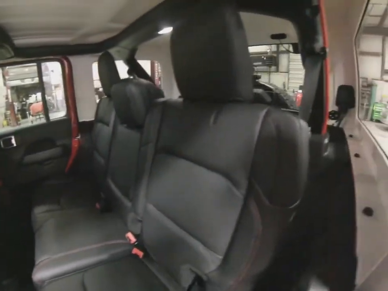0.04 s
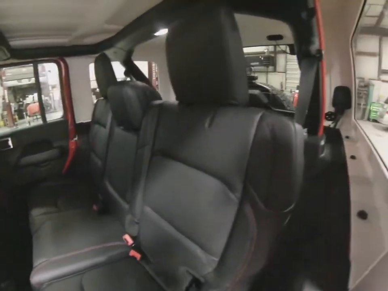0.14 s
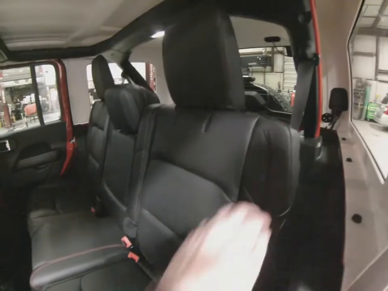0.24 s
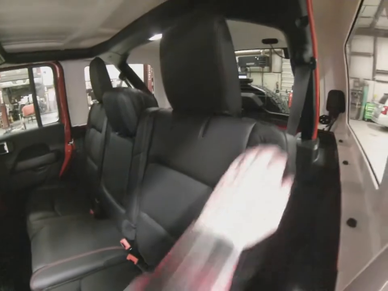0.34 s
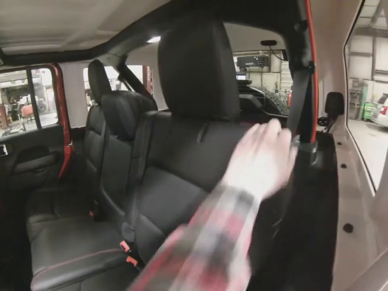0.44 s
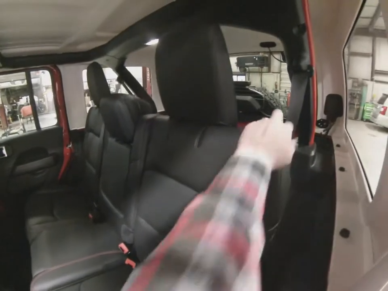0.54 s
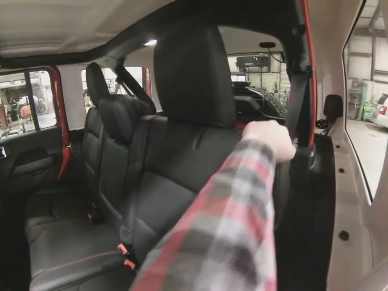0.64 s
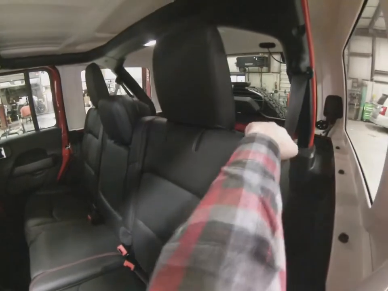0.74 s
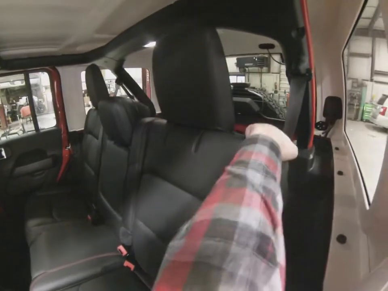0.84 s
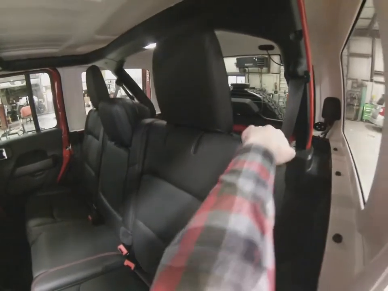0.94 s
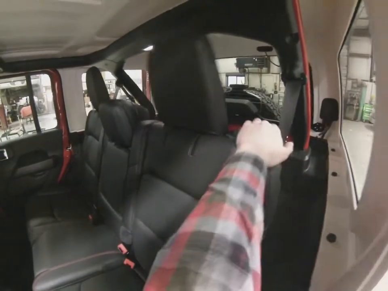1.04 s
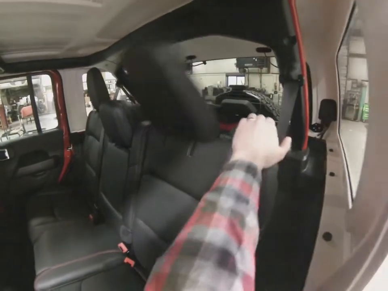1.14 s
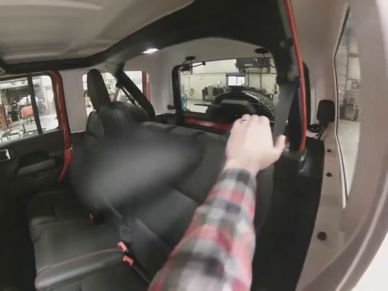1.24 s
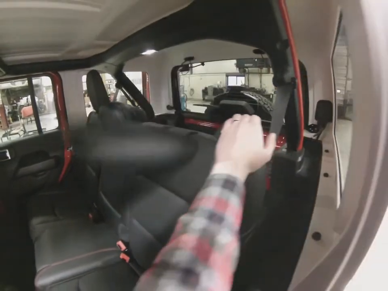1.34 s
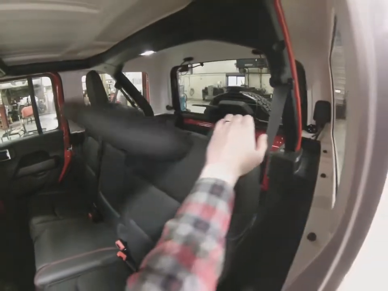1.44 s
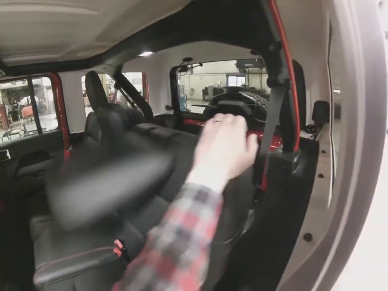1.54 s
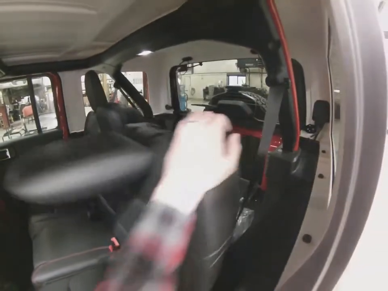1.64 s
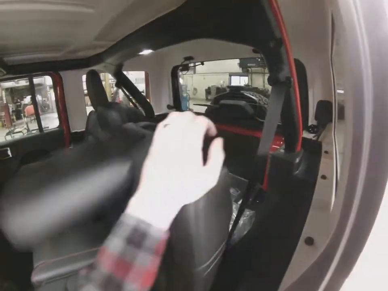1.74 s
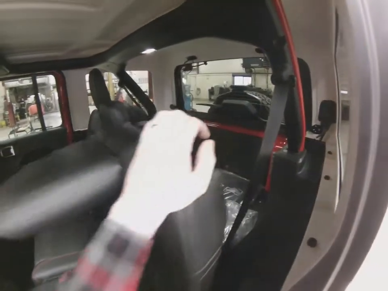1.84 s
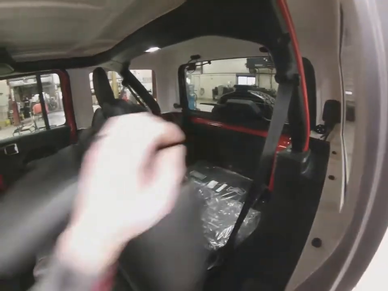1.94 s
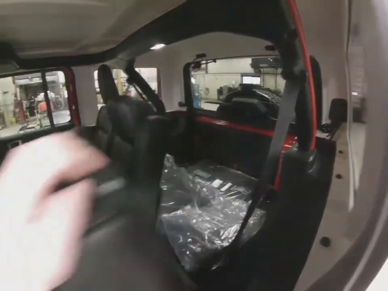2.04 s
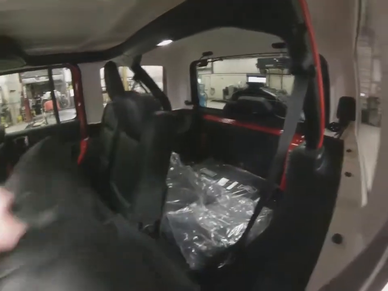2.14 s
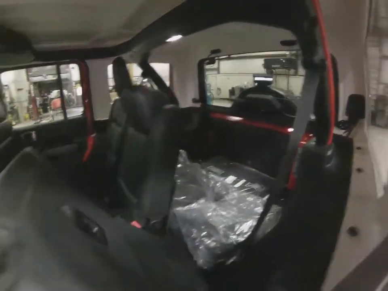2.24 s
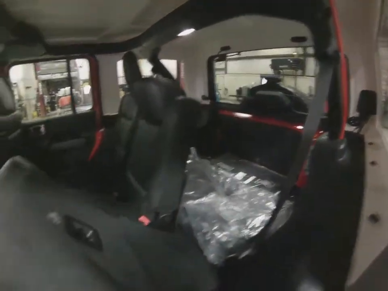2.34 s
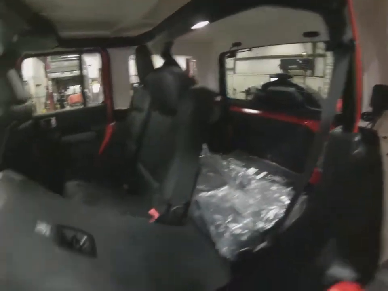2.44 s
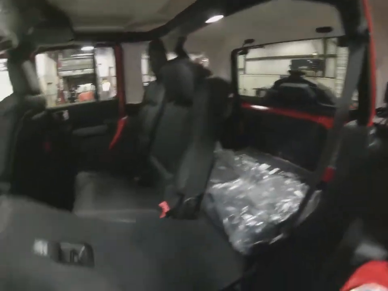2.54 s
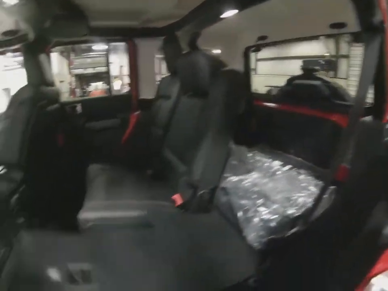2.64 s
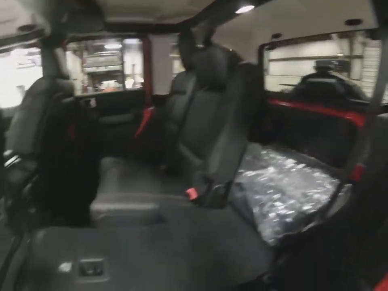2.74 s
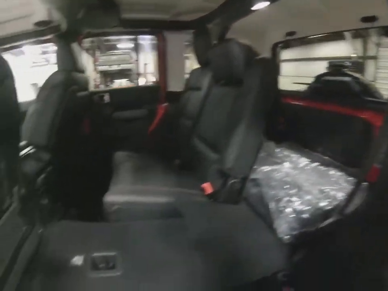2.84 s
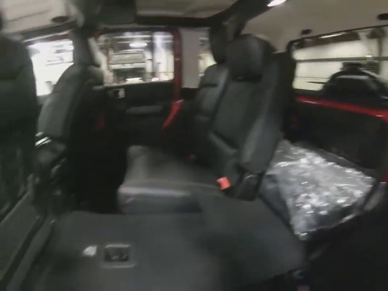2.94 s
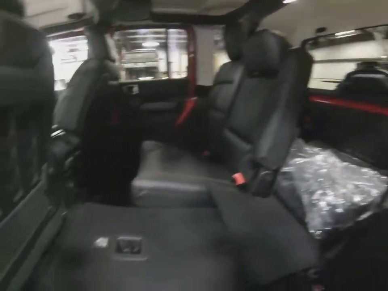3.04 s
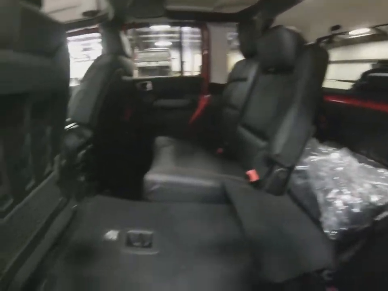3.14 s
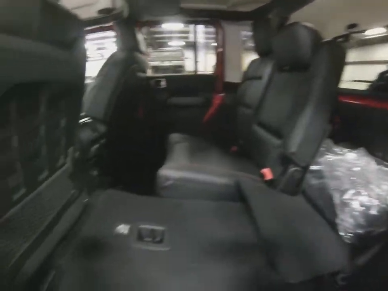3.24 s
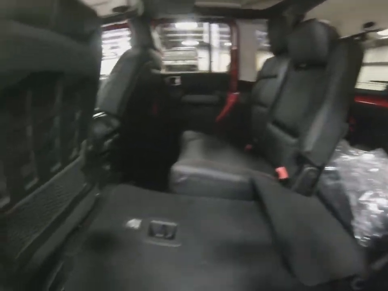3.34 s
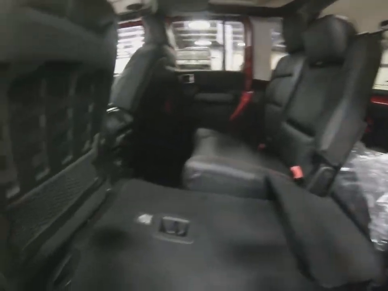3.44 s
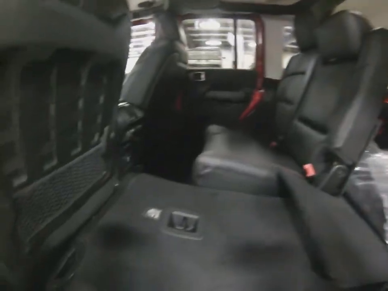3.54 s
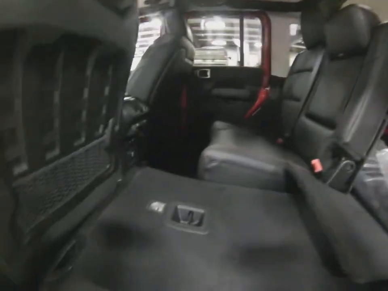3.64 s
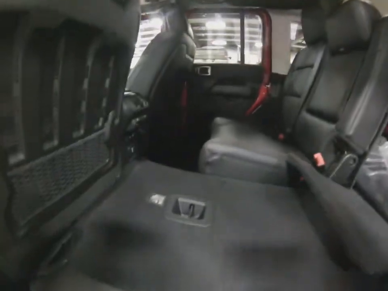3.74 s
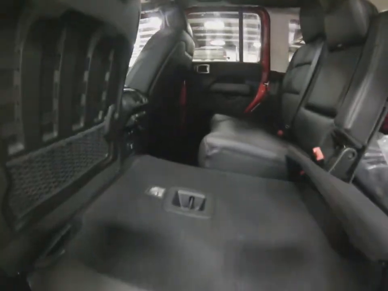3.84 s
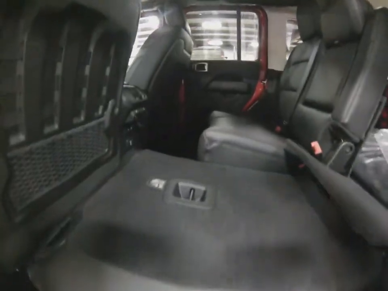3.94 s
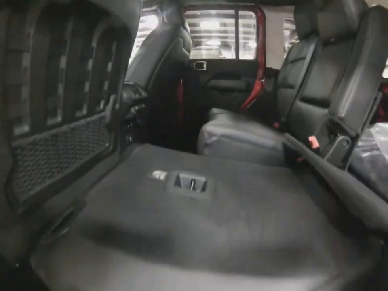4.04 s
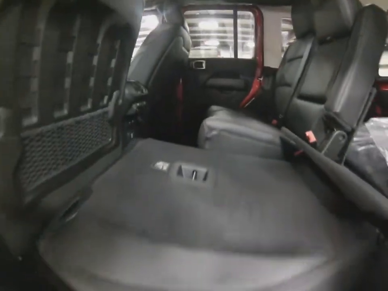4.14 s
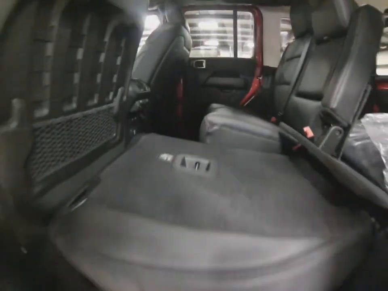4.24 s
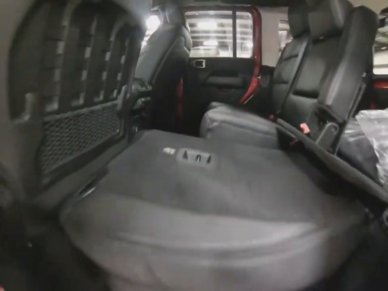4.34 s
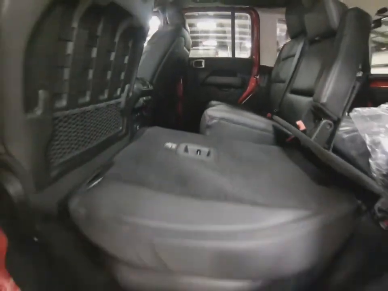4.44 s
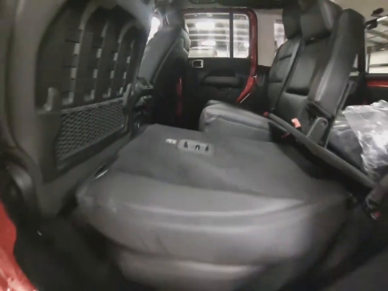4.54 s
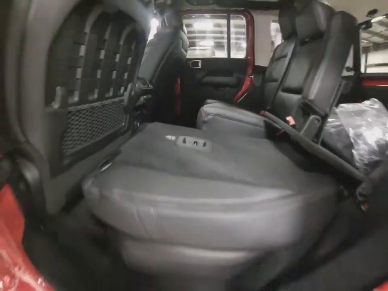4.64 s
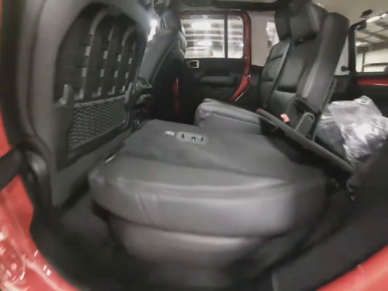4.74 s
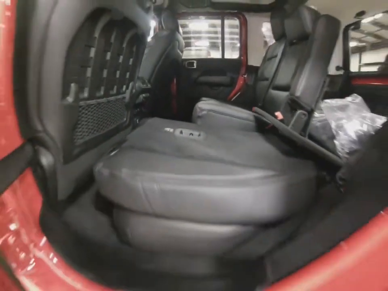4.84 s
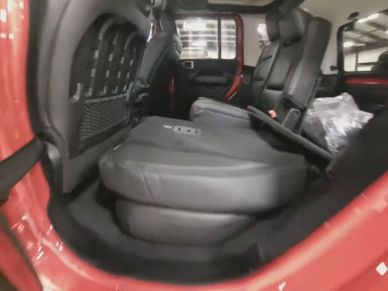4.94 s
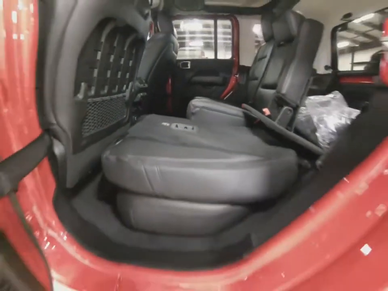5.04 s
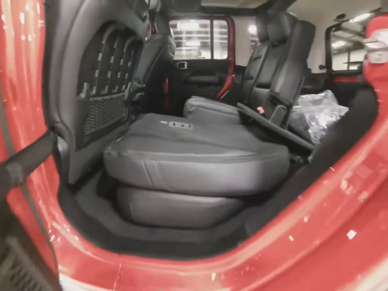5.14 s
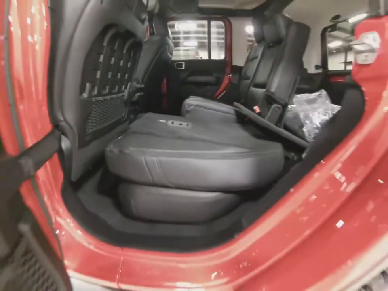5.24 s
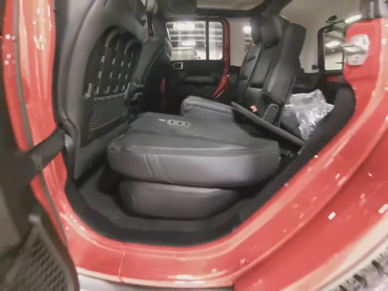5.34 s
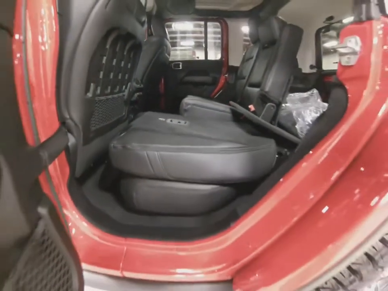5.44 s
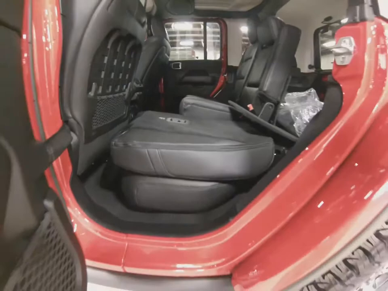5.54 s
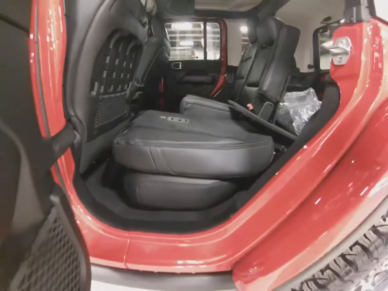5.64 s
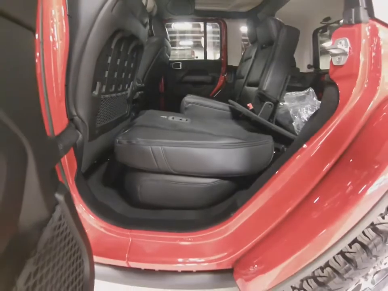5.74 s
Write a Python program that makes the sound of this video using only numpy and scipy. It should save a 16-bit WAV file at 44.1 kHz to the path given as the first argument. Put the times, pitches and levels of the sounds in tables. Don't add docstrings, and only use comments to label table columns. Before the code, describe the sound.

Inside a car parked in a large hall, a latch clicks, the headrest drops with padded knocks and shrinking bounces, leather creaks, and the seatback lands with a deep thud and metal clack. The body rocks in low rumble, then only distant hum and air noise remain, growing as the close handheld microphone backs out of the door.

```python
import sys
import numpy as np
from scipy import signal
from scipy.io import wavfile
from scipy.ndimage import uniform_filter1d

SR = 44100
rng = np.random.default_rng(int(sys.argv[2]) if len(sys.argv) > 2 else 0)


def master(y):
    cut = np.clip(np.atleast_2d(y).T, -1, 1)
    pcm = np.round(cut * 32767)
    wavfile.write(sys.argv[1], SR, pcm.astype(np.int16))


def nominal_scale(level):
    x = np.asarray(level, float) / 20
    return 10 ** x


N = 255716


def evened(x):
    return x / np.sqrt(np.mean(x ** 2) + 1e-20)


def wander(smoothing):
    return evened(uniform_filter1d(rng.standard_normal(N), smoothing))


def curve(rows):
    s, *columns = np.transpose(rows)
    return [np.interp(np.arange(N) / SR, s, c) for c in columns]


def colour(x, points, count=4096):
    hz, db = np.transpose(points)
    grid = abs(np.fft.fftfreq(count, 1 / SR)) + 1
    gain_db = np.interp(np.log(grid), np.log(hz), db, left=db[0] - 38.0, right=db[-1] - 59.5)
    log_gain = np.log(nominal_scale(gain_db))
    taps = np.fft.ifft(np.exp(np.conj(signal.hilbert(log_gain)))).real[:count // 2]
    return signal.oaconvolve(x, taps / np.linalg.norm(taps))[:len(x)]


def resonate(x, hz, width):
    r = np.exp(-np.pi * width / SR)
    return 2 * signal.lfilter([1 - r], [1, -r * np.exp(2j * np.pi * hz / SR)], x).real


def two_poles(x, hz, width):
    return resonate(resonate(x, hz, width), hz, 2 * width)


def grit(size, per_s, spread_db):
    chance, big = rng.random(size), rng.exponential(1, size)
    impulses = (chance < per_s / SR) * nominal_scale(spread_db * np.minimum(big, 4))
    return evened(impulses * rng.choice([-1., 1.], size))


def add(mix, s, sound):
    part = mix[round(s * SR):][:len(sound)]
    part += sound[:len(part)]


# (time [s], level [dB])
AIR_RISE = [
    (0, -55.5),
    (1, -54.5),
    (3.2, -55),
    (4.2, -53),
    (4.6, -52.5),
    (4.9, -50),
    (5.3, -48.5),
    (5.8, -48),
]
# (frequency [Hz], level [dB])
HALL_AIR = [(30, -7), (45, -9), (70, -8.5), (120, -4.5), (180, -12.5), (300, -20), (470, -28), (520, -26),
            (1000, -22), (1500, -19.5), (2800, -23), (3400, -29.5), (7000, -36.5), (15400, -49)]
# (frequency [Hz], level [dB], width [Hz], share of the door effect [1])
DUCTS = [(59, -61, 28, 0.7), (86.4, -58, 5.9, 0.79), (101.3, -77, 6.5, .5), (263.4, -70, 10, 0.96),
         (361, -61, 103, 0.6), (425, -62, 67, 0.33), (687, -63.5, 115, 0.75), (865, -66.5, 62, 0.48),
         (1137, -69, 53, 0.61), (1415, -67.5, 98, 0.48), (2660, -68.5, 550, 0.39), (13400, -75, 2500, .2)]
# (multiple [1], level [dB], share of the door effect [1])
SHAFT_TONES = [(2, -58, 1.8), (3, -52, 0.9), (4, -55, 0.4), (5, -96, 0.82), (6, -65.5, 0.59),
               (7, -61, 1.73), (12, -74.5, 0.81), (13, -68.5, 0.27), (14, -64.5, 0.22), (17.5, -67.5, 1.33)]


def hall():
    shaft_hz = 33.43
    air_db, = curve(AIR_RISE)
    door_db = air_db - air_db.mean()
    swell_db = 0.52 * wander(4000)
    air = nominal_scale(air_db + swell_db) * colour(rng.standard_normal(N), HALL_AIR, count=16384)
    _, _, z = signal.stft(air, nperseg=1024)
    patches = uniform_filter1d(rng.standard_normal(z.shape), size=10, axis=0)
    patches = evened(uniform_filter1d(patches, size=14, axis=1))
    air = signal.istft(z * nominal_scale(1.05 * patches), nperseg=1024)[1][:N]
    for hz, db, width, share in DUCTS:
        line = two_poles(rng.standard_normal(N + SR // 2), hz, width)[SR // 2:]
        air = air + nominal_scale(db + share * door_db) * evened(line)
    turns = np.cumsum(shaft_hz * (1 + 0.00199 * wander(20000))) / SR
    for multiple, db, share in SHAFT_TONES:
        level_db = db + share * door_db + 0.8 * wander(8000)
        order = np.round(2 * multiple) / 2
        air = air + np.sqrt(2) * nominal_scale(level_db) * np.cos(2 * np.pi * order * turns)
    return air


# (time [s], stirring of the body [dB], shudder of the machine in the cabin [dB])
BODY_MOTION = [(0, -37, -49.5), (.9, -49.5, -37.5), (1.3, -36, -37), (2.0, -43, -30.5), (2.5, -43, -40.5),
               (3.0, -51, -44), (3.3, -48, -40.5), (3.7, -39.5, -36.5), (4.2, -40.5, -37), (4.8, -42, -40),
               (5.1, -43.5, -43), (5.8, -46, -49)]


def rocking():
    stir_db, shudder_db = curve(BODY_MOTION)
    shudder = np.cos(2 * np.pi * np.cumsum(33.5 * (1 + 0.024 * wander(9000))) / SR)
    sway = evened(resonate(resonate(rng.standard_normal(N), 15.1, 10.8), 21.2, 19.0))
    boom = evened(resonate(resonate(rng.standard_normal(N), 54.0, 21), 54.5, 28))
    stir = nominal_scale(1.5) * sway + nominal_scale(-7) * boom
    return np.sqrt(2) * nominal_scale(shudder_db) * shudder + nominal_scale(stir_db) * stir


# (middle [s], length [s], hiss [dB], creak [dB])
RUBS = [(0.48, .2, -64, -70), (0.667, 0.17, -62.5, -85), (1.127, 0.35, -56.5, -53),
        (1.357, 0.16, -52.5, -44.5), (1.505, 0.15, -58, -52.5), (1.636, 0.13, -53, -39.5),
        (1.792, 0.22, -61, -50), (2.03, 0.11, -59, -43.5), (2.155, 0.13, -62, -56),
        (2.259, 0.13, -58.5, -47.5), (2.512, 0.39, -55.5, -50.5), (2.702, 0.1, -48.5, -40.5),
        (2.84, 0.18, -72, -50), (3.046, 0.21, -62.5, -59), (4.642, 0.18, -68, -57)]
# (frequency [Hz], level [dB])
HIDE_HISS = [(1470, -19), (2500, -6), (2780, -16), (3310, -5.5), (9610, -11), (14400, -12), (15400, -8)]
# (frequency [Hz], level [dB])
HIDE_CREAK = [(71, -19.5), (120, 2), (459, -18), (504, -15.5), (658, -18), (805, -14.5), (1530, -19),
              (5000, -32), (6500, -33.5), (11000, -120)]


def leather():
    squareness, rest_hiss_db, rest_creak_db = 3.1, -88, -59
    s, length, hiss_db, creak_db = np.transpose(RUBS)
    swell = np.exp(-abs(2 * (np.arange(N)[:, None] / SR - s) / length) ** squareness)
    hiss_level = nominal_scale(rest_hiss_db) + swell @ nominal_scale(hiss_db)
    creak_level = nominal_scale(rest_creak_db) + swell @ nominal_scale(creak_db)
    clumps_db = 1.55 * wander(500)
    hiss = colour(grit(N, 9000, 0.69), HIDE_HISS) * hiss_level * nominal_scale(0.28 * clumps_db)
    creak = colour(grit(N, 4000, 2.2), HIDE_CREAK) * creak_level * nominal_scale(clumps_db)
    return hiss + creak


# (time [s], level [dB], pitch [Hz], width [Hz], length
# [s])
METAL_SQUEAKS = [
    (.4445, -39, 9300, 1900, .003),
    (2.194, -60, 6300, 250, .03),
    (2.435, -51.5, 1570, 160, .045),
    (2.681, -37, 1690, 140, .009),
    (2.689, -40, 1600, 140, .016),
    (1.966, -57, 8500, 250, .008),
    (2.95, -66, 12500, 3500, .12),
    (3.045, -65, 13500, 3500, .1),
    (4.61, -67, 13800, 2200, .055),
]


def squeaks():
    mix = np.zeros(N)
    for s, db, hz, width, length in METAL_SQUEAKS:
        ring = evened(two_poles(rng.standard_normal(6000), hz, width))
        ring = ring[-int(length * SR) - 8:]
        add(mix, s, nominal_scale(db) * ring * signal.windows.tukey(len(ring), .4))
    return mix


def shape(t, hold, rise, t60):
    fall = np.maximum(t - hold, 0) + 0.5 * np.minimum(t, hold)
    return (1 - np.exp(-t / rise)) * nominal_scale(-60 * fall / t60)


# (frequency [Hz], level [dB])
LOW_PUSH = [(40, -38.5), (60, 4.5), (130, 2), (250, -6), (420, -13)]


def blows(table, body, top, per_s, ring_db, ring_width, t60s, rise, body_db):
    mix, t = np.zeros(N), np.arange(9000) / SR
    for s, db, ring_hz, top_db, bass_db, hold in table:
        rattle = grit(len(t), per_s, 4.7)
        rattle[round(2 * rise * SR)] = -7.5
        mid = rattle * shape(t, hold, rise, t60s[0])
        ring = resonate(mid, ring_hz, ring_width) * np.sqrt(SR / ring_width / 6)
        sound = nominal_scale(body_db) * (colour(mid, body) + nominal_scale(ring_db) * ring)
        sound += nominal_scale(top_db + 7.0) * colour(rattle * shape(t, hold, rise, t60s[1]), top)
        sound += nominal_scale(bass_db + 8.5) * colour(rattle * shape(t, hold, 3 * rise, t60s[2]), LOW_PUSH)
        add(mix, s + .002, nominal_scale(db - 11.5) * sound)
    return mix


# (time [s], peak [dB], treble [dB], bass [dB], rattle length [s])
LATCH_CLICKS = [(0.523, -28.5, -11.5, -12, 0.0088), (0.976, -22.5, -16, -10, 0.016),
                (1.036, -27, -6.5, -3.5, 0.016), (1.051, -21, -7, -21, 0.019),
                (1.919, -18, -6.5, -7, 0.0036), (2.229, -29.5, -27, -17, 0.0098),
                (2.273, -27, -12, -30, 0.025), (2.303, -40, -23, 1.5, 0.013), (2.474, -33, -11, -7, 0.025),
                (2.508, -34.5, -6, 1, 0.014), (2.713, -16, -25, -5, 0.0039),
                (2.729, -23.5, -18, -3, 0.0076)]
# (frequency [Hz], level [dB])
LATCH_BODY = [(150, -1.5), (250, -10), (351, 3.5), (674, 1), (1630, -0.5), (2520, -3), (3130, -5),
              (4500, -6), (5850, -18), (9900, -120)]
# (frequency [Hz], level [dB])
LATCH_FIZZ = [(1760, -16), (3000, -6), (4310, 4), (5220, 4.5), (6410, -2), (7060, -2), (8550, 0),
              (11100, -7.5), (12900, -5), (15400, -6)]


def clicks():
    ring_hz = 1130
    rows = [(s, db, ring_hz, *rest) for s, db, *rest in LATCH_CLICKS]
    return blows(rows, LATCH_BODY, LATCH_FIZZ, per_s=7000, ring_db=-40.0, ring_width=150,
                 t60s=(.1, .09, .12), rise=0.00026, body_db=0.0)


# (time [s], level [dB], pitch [Hz], length [s])
LATCH_CHATTER = [(0.5251, -44, 1540, .002), (0.5259, -41.5, 2810, 0.0054), (0.5238, -36, 715, 0.013),
                 (.531, -40, 1215, .012), (0.997, -43, 1290, 0.011), (1.04, -39.5, 530, 0.029),
                 (1.313, -37, 570, 0.016), (1.813, -44, 845, 0.022), (1.928, -32.5, 590, 0.013),
                 (1.931, -51, 1060, 0.015), (1.925, -46, 810, 0.0066), (2.235, -42, 1720, 0.011),
                 (2.236, -44, 1130, .013), (2.276, -40.5, 1150, 0.019), (2.277, -49, 2170, .022),
                 (2.284, -53, 5630, .02), (2.475, -45, 1550, 0.019), (2.72, -42, 330, 0.023),
                 (2.725, -31, 646, 0.064)]
# (time [s], level [dB], pitch [Hz], width [Hz], length [s])
TRIM_RATTLES = [(0.98, -53, 8000, 900, .012), (1.035, -44, 3470, 2000, 0.016),
                (1.053, -44, 13500, 1200, 0.026), (1.057, -42, 6600, 900, 0.036),
                (1.341, -45.5, 1400, 900, 0.028), (1.619, -49, 1550, 500, 0.014),
                (2.031, -58, 3100, 700, 0.02), (2.155, -54, 860, 400, .016), (2.211, -53, 2500, 2000, .01),
                (2.7167, -31, 1500, 330, .002), (2.717, -43.5, 4330, 2500, 0.026),
                (2.721, -34, 2240, 980, 0.029), (2.723, -31, 1120, 496, 0.012)]


def rings():
    mix, t = np.zeros(N), np.arange(4000) / SR
    chatter = [(s, db - 5.0, hz, 100 + .04 * hz, length) for s, db, hz, length in LATCH_CHATTER]
    for s, db, hz, width, length in TRIM_RATTLES + chatter:
        jolts = grit(len(t), 3000, 3.0) * shape(t, length, 0.00019, 0.045)
        jolts[20] = -.2 / (length + .004)
        ring = two_poles(jolts, hz, width)
        add(mix, s, nominal_scale(db) * ring / np.std(ring[:int(length * SR) + 250]))
    return mix


def contacts(table, cycles, trim_db):
    mix, t = np.zeros(N), np.arange(-800, 800) / SR
    lean = np.where(t < 0, 1.5 * t, t)
    for s, db, hz in table:
        swell = np.exp(-(lean * hz / cycles) ** 2)
        add(mix, s + t[0], nominal_scale(db + trim_db) * swell * np.cos(2 * np.pi * hz * (t + s)))
    return mix


# (time [s], peak [dB], pitch [Hz])
METAL_TICKS = [(0.5269, -31.0, 1480), (0.5306, -31.0, 1190), (0.5353, -32.5, 1280), (0.5379, -36.0, 1280),
               (0.9805, -30.0, 1190), (0.9832, -29.5, 1280), (0.9857, -33.0, 1280), (0.9883, -33.0, 1280),
               (0.9909, -36.0, 1190), (1.0372, -36.0, 4500), (1.0415, -30.5, 3110), (1.0448, -35.0, 3110),
               (1.0474, -35.5, 3600), (1.0538, -36.5, 1020), (1.0574, -34.5, 4500), (1.0628, -34.5, 1600),
               (1.3107, -37.0, 950), (1.3142, -36.5, 1600), (1.3195, -37.0, 1020), (1.3427, -33.5, 1480),
               (1.3453, -36.5, 1100), (1.3501, -35.5, 1190), (1.3528, -37.0, 1100), (1.6087, -36.5, 1190),
               (1.6237, -35.5, 1480), (1.6396, -35.0, 950), (1.6507, -36.0, 1480), (1.9216, -29.0, 4500),
               (1.9246, -28.0, 1380), (1.9276, -29.5, 950), (1.9304, -28.5, 1100), (1.9331, -31.5, 1100),
               (1.9358, -30.5, 1100), (1.9388, -30.5, 1020), (1.9417, -35.5, 950), (2.151, -40, 1300.0),
               (2.2359, -32.0, 1720), (2.2402, -35.5, 1190), (2.2765, -34.5, 2150), (2.2812, -36.5, 1100),
               (2.2838, -33.0, 1190), (2.4764, -35.5, 1480), (2.479, -29.5, 1480), (2.4816, -34.5, 1600),
               (2.7011, -38.5, 1600), (2.7049, -31.0, 1720), (2.7159, -25.5, 1600), (2.7185, -15.0, 1480),
               (2.721, -21.0, 1850), (2.7245, -20.5, 1990), (2.7275, -21.5, 1480), (2.7316, -26.0, 1600),
               (2.7344, -23.0, 1720), (2.739, -23.0, 2310), (2.7426, -29.0, 2310), (2.7455, -29.5, 1480),
               (2.7485, -34.0, 1100), (2.7512, -36.0, 1100)]


def ticks():
    return contacts(METAL_TICKS, cycles=2.5, trim_db=-2.0)


# (time [s], peak [dB],
# pitch [Hz])
TRIM_SNAPS = [(0.5282, -32.0, 730), (0.5314, -37.5, 670), (0.5404, -36.5, 1240), (0.5436, -37.5, 1480),
              (0.9788, -30.5, 3600), (0.982, -34.0, 3020), (0.9931, -33.5, 1940), (0.9996, -35.5, 1360),
              (1.3117, -33.0, 610), (1.3149, -33.5, 560), (1.3181, -31.5, 670), (1.3228, -30.5, 560),
              (1.326, -35.0, 670), (1.3423, -34.0, 560), (1.3455, -31.5, 730), (1.6005, -36.0, 1040),
              (1.6114, -31.5, 560), (1.6266, -36.5, 1770), (1.6344, -33.0, 800), (1.6421, -32.0, 870),
              (1.6502, -34.5, 950), (1.709, -46, 1650), (1.722, -46, 1750), (1.764, -46, 1500),
              (1.777, -44, 1750), (1.8146, -36.0, 870), (1.8184, -38.5, 2120), (1.8246, -39.0, 800),
              (1.8284, -40.0, 950), (1.832, -37.0, 800), (1.8566, -39.0, 730), (1.8612, -37.0, 730),
              (2.0182, -42.0, 3020), (2.0411, -41.5, 2760), (2.0485, -42.0, 2310), (2.0531, -41.0, 1360),
              (2.0622, -39.0, 1360), (2.0687, -40.0, 870), (2.073, -41.5, 870), (2.1555, -41.0, 870),
              (2.1749, -41.5, 1360), (2.2112, -41.5, 3020), (2.2202, -41.0, 1240), (2.2323, -39.0, 1140),
              (2.2355, -35.0, 1140), (2.2394, -37.0, 1940), (2.243, -38.0, 1940), (2.2466, -40.0, 1940),
              (2.2515, -41.5, 1240), (2.2753, -36.0, 1240), (2.279, -40.0, 1940), (2.2832, -33.5, 1940),
              (2.2888, -36.0, 2120), (2.292, -39.0, 1140), (2.2979, -40.0, 1040), (2.3011, -36.5, 1360),
              (2.3052, -42.0, 1620), (2.7175, -21.5, 2530), (2.727, -22.5, 2310), (2.7361, -25.0, 2760)]


def snaps():
    return contacts(TRIM_SNAPS, cycles=1.6, trim_db=-2)


# (time [s], peak [dB], pitch [Hz])
FRAME_TAPS = [(0.5345, -39, 700), (0.9845, -37, 520), (1.0397, -30.5, 330), (1.0468, -29.0, 620),
              (1.055, -32.5, 210), (1.0582, -27.0, 540), (1.0614, -34.5, 540), (1.3094, -34.0, 280),
              (1.3132, -29.0, 350), (1.3197, -28.5, 270), (1.3246, -28.5, 350), (1.3284, -29.5, 400),
              (1.3395, -26.5, 280), (1.3482, -23.5, 430), (1.3514, -26.5, 470), (1.358, -31.5, 200),
              (1.3613, -29.0, 470), (1.3646, -34.0, 200), (1.6069, -28.5, 280), (1.6133, -31.5, 250),
              (1.6318, -32.0, 230), (1.6362, -25.5, 310), (1.6405, -27.0, 430), (1.6468, -28.0, 400),
              (1.6501, -29.5, 330), (1.657, -30.5, 400), (1.6673, -33.5, 330), (1.8218, -32.0, 430),
              (1.825, -33.5, 270), (1.8471, -34.0, 210), (1.8517, -30.5, 280), (1.8569, -34.0, 200),
              (1.8613, -29.5, 310), (1.8695, -33.0, 310), (1.9222, -30.5, 540), (1.9254, -27.0, 660),
              (1.9286, -21.5, 880), (1.9319, -29.5, 880), (1.9371, -25.0, 710), (1.9403, -26.0, 820),
              (1.9435, -29.5, 470), (2.0755, -33.5, 200), (2.479, -33.5, 350), (2.5188, -34.0, 330),
              (2.6572, -33.5, 330), (2.6612, -34.0, 270), (2.6813, -36.5, 280), (2.7041, -27.0, 210),
              (2.7134, -28.5, 270), (2.7192, -25.5, 540), (2.7232, -21.5, 880), (2.7264, -19.5, 660),
              (2.7296, -25.0, 880), (2.7339, -19.5, 620), (2.7401, -18.0, 380), (2.7436, -24.0, 350),
              (2.7473, -26.5, 310), (2.7562, -25.5, 230), (2.762, -29.5, 200), (2.7887, -34.0, 350)]


def taps():
    return contacts(FRAME_TAPS, cycles=1.1, trim_db=-2.5)


# (crest [s], level [dB], pitch [Hz], t60 [s])
BODY_SWINGS = [(1.162, -26, 28.5, 0.58), (1.248, -25, 25.5, 0.63), (2.222, -35, 18, 0.34),
               (2.345, -29, 18.4, 0.69), (2.467, -32, 28, 0.35), (2.581, -25, 13.7, 0.46),
               (2.756, -18, 18, 1.5), (2.757, -13, 34, 0.066), (2.808, -15, 30, 0.08),
               (2.88, -14, 16.5, 1.85), (2.942, -18.5, 47, 0.13), (3.003, -20, 24.4, 0.36),
               (3.128, -22, 24, 0.16)]
# (time [s], strength [dB])
HEADREST_BOUNCES = [
    (1.309, -12),
    (1.602, -15.5),
    (1.817, -19),
    (2.018, -20.3),
]
# (delay of the crest [s], level [dB], pitch [Hz], t60 [s])
SEAT_MODES = [
    (.038, -4.6, 30.4, .54),
    (.091, 0, 33.4, .39),
    (.088, -10.4, 25.1, 1.5),
    (.16, -12.5, 17.2, 1.2),
]


def swings():
    rows = BODY_SWINGS + [(s + delay, db + share_db, hz, t60) for s, db in HEADREST_BOUNCES
                          for delay, share_db, hz, t60 in SEAT_MODES]
    mix, t = np.zeros(N), np.arange(-SR // 5, SR) / SR
    for s, db, hz, t60 in rows:
        rise = np.exp(-(np.minimum(t, 0) * hz / .6) ** 2)
        decay = nominal_scale(db - 60 * np.maximum(t, 0) / t60) * np.minimum(5 * (1 - t), 1)
        add(mix, s + t[0], rise * decay * np.cos(2 * np.pi * hz * t))
    return mix


# (time [s], peak [dB], ring [Hz], bass [dB], rattle length [s])
FRAME_KNOCKS = [(1.306, -16.5, 387, -4.5, 0.026), (1.339, -19, 430, -14, 0.022),
                (1.357, -29.5, 250, -5, 0.03), (1.596, -20, 400, -27, 0.005), (1.604, -31, 430, -25, 0.008),
                (1.631, -16, 394, -16, 0.018), (1.658, -30.5, 253, -1, 0.02),
                (1.815, -23.5, 467, -2.5, 0.015), (1.847, -25, 314, -1, 0.026),
                (2.019, -27.5, 320, -2, 0.0099), (2.049, -32.5, 250, 2, 0.029),
                (2.066, -30, 315, -0.5, 0.0054), (2.146, -26, 300, -14, 0.03),
                (2.207, -32, 275, -16, 0.015), (2.649, -26, 264, -2, 0.011), (2.705, -25, 258, -7, 0.03),
                (2.737, -17.5, 390, -4.5, 0.019), (2.804, -32, 250, 2.5, 0.076)]
# (frequency [Hz], level [dB])
PADDED_FRAME = [(88, -29), (150, -13), (459, -5.5), (685, -15), (761, -10.5), (1320, -18), (1800, -21),
                (2500, -38), (3250, -87), (5500, -120)]
# (frequency [Hz], level [dB])
COVER_SCUFF = [(800, -11), (1500, 9), (2500, -1), (4500, -13), (7000, -22), (15000, -33)]


def knocks():
    rows = [(s, db, hz, -47.5 - db, *rest) for s, db, hz, *rest in FRAME_KNOCKS]
    return blows(rows, PADDED_FRAME, COVER_SCUFF, per_s=1400, ring_db=-6.0, ring_width=320,
                 t60s=(.06, .07, .1), rise=0.00089, body_db=-4.0)


# (time [s], level [dB], pitch [Hz], t60 [s], first pressure up +1 or down -1)
PADDING_PUSHES = [
    (1.3161, -13.5, 340, .0055, -1),
    (1.3439, -17.5, 380, .0055, 1),
    (1.6085, -22, 300, .011, -1),
    (1.6368, -25, 330, .011, 1),
    (2.476, -35, 380, .03, -1),
    (2.707, -21, 228, .03, -1),
    (2.739, -12.5, 58, .037, -1),
]


def pushes():
    mix, t = np.zeros(N), np.arange(8000) / SR
    for s, db, hz, t60, way in PADDING_PUSHES:
        add(mix, s, way * nominal_scale(db - 60 * t / t60) * np.sin(2 * np.pi * hz * t) * 2)
    return mix


def cabin(x):
    t60, wet_db = 0.096, -14
    t = np.arange(SR // 2) / SR
    echoes = grit(len(t), 2500, 1.0) * nominal_scale(-60 * t / t60) * (t > .004)
    tail = colour(echoes, [(60, -1.5), (1500, -5.5), (4000, -7.5), (12000, -10.0)])
    return x + nominal_scale(wet_db) * signal.oaconvolve(x, tail / np.linalg.norm(tail))[:N]


def scene():
    impacts = squeaks() + clicks() + rings() + ticks() + snaps() + taps() + knocks()
    mono = hall() + rocking() + leather() + cabin(impacts) + swings() + pushes()
    return np.array([mono, mono])


# (frequency [Hz], level [dB])
SELF_NOISE = [(590, -45), (1000, -10), (2150, -26.5), (3290, -15.5), (4130, -13), (15400, -26.5)]


def microphone(x):
    x = x + nominal_scale(-65) * colour(rng.standard_normal(N), SELF_NOISE)
    return signal.oaconvolve(x, signal.firwin(301, 15300, window=("kaiser", 8), fs=SR), "same")


# (frequency [Hz], side minus mid [dB])
SIDE_LEVEL = [(20, -32), (100, -19), (250, -17.5), (500, -22.5), (1200, -19), (4000, -16.5), (8000, -10.5),
              (15000, -15)]
# (frequency [Hz], share of moments [1])
SIDE_SHARE = [(20, 0.12), (300, .22), (800, 0.146), (4000, .08), (8000, 0.394), (15000, 0.17)]


def stereo(mid):
    rebound_s = 2.756
    hz, t, z = signal.stft(mid, SR, nperseg=2048)
    level_db, share = (np.interp(np.log(hz + 1), np.log(f), v)[:, None]
                       for f, v in (np.transpose(SIDE_LEVEL), np.transpose(SIDE_SHARE)))
    band = np.round(4 * np.log2(np.maximum(hz, 250) / 250)).astype(int)
    chance = .5 * rng.random((40, len(t)))[band] + .5 * rng.random(len(t))
    parted = chance < np.sqrt(share / 2)
    parted = parted | (abs(t - rebound_s - .07) < .09)
    grain = z * parted * nominal_scale(level_db) * np.exp(2j * np.pi * rng.random(z.shape))
    side = signal.istft(grain, SR, nperseg=2048)[1][:N]
    return np.array([mid + side, mid - side])


def roll_off(x):
    return signal.sosfilt(signal.butter(12, 16370, fs=SR, output="sos"), x)


def record(dry):
    mix = stereo(microphone(dry[0]))
    return roll_off(mix)


dry = scene()
out = record(dry)
master(out)
```